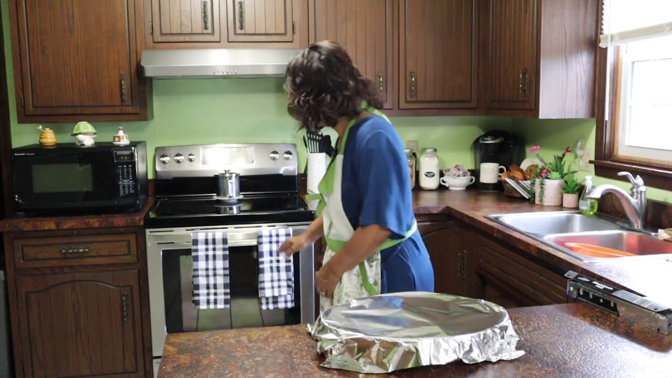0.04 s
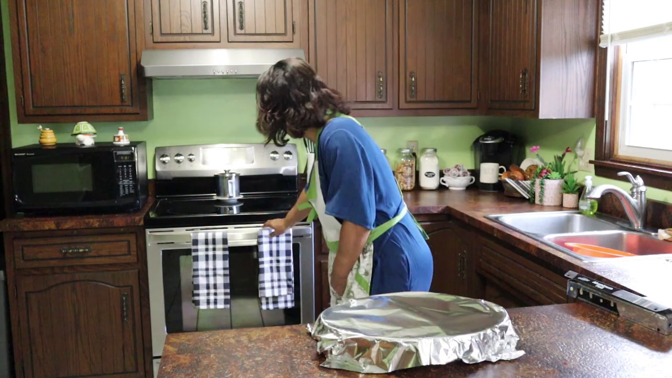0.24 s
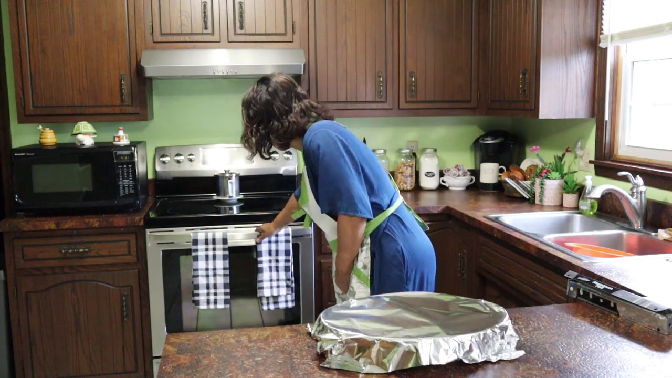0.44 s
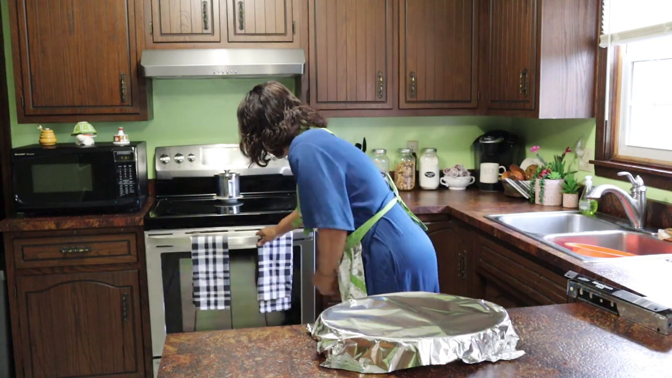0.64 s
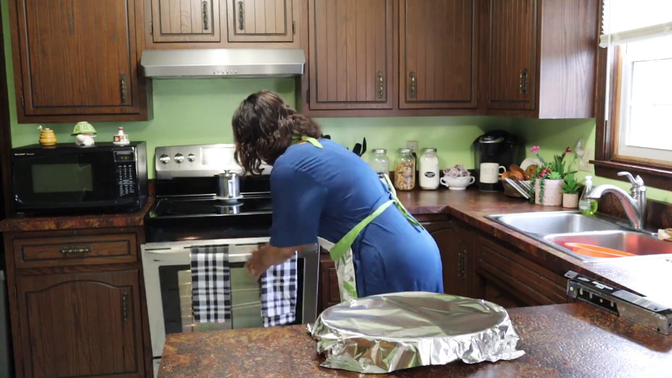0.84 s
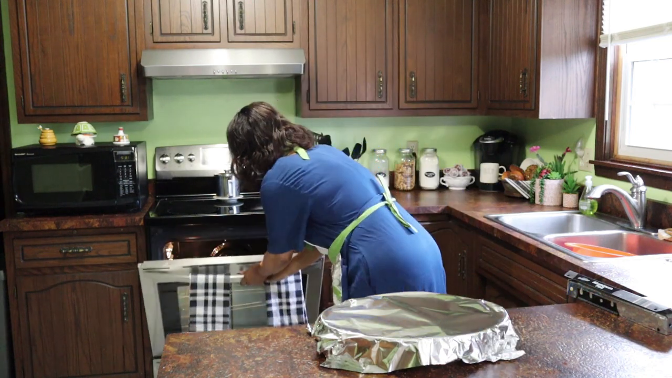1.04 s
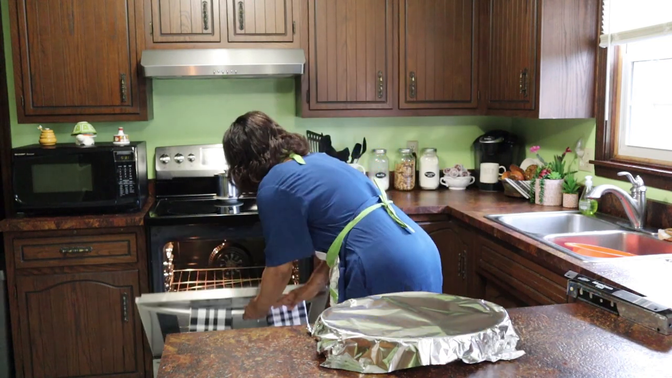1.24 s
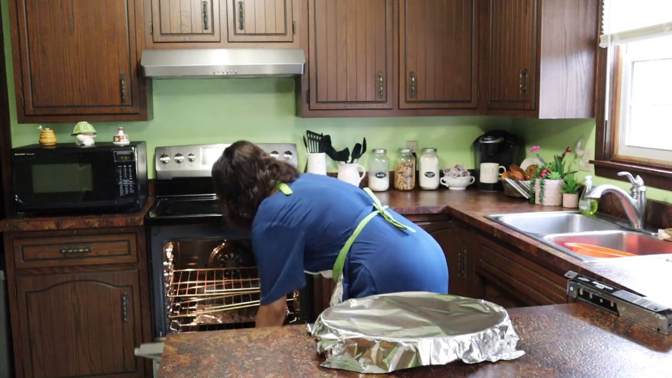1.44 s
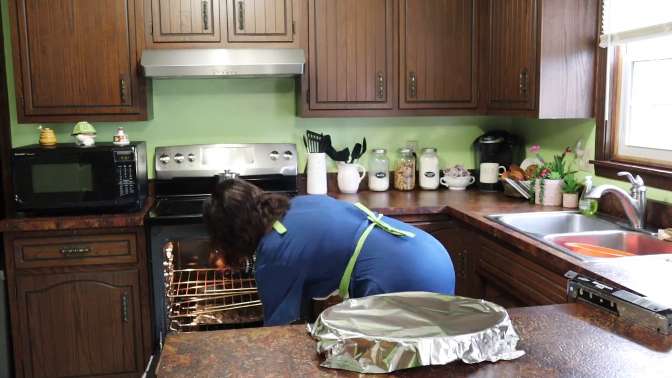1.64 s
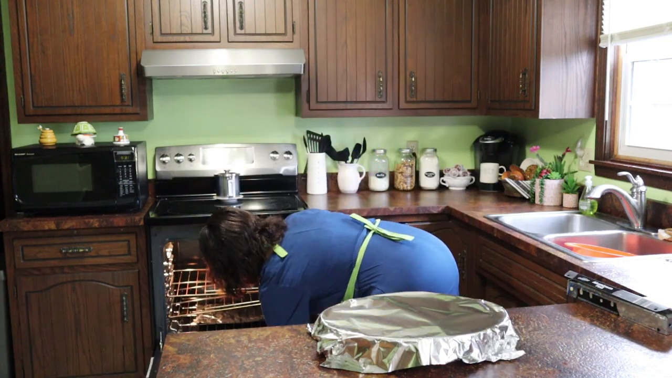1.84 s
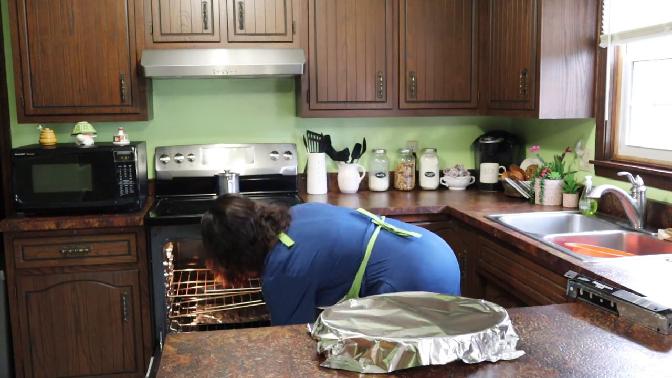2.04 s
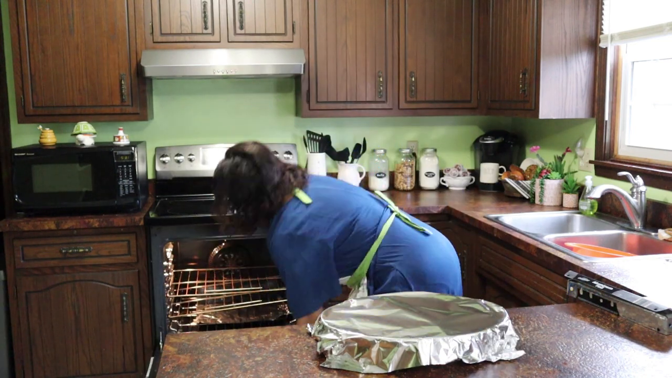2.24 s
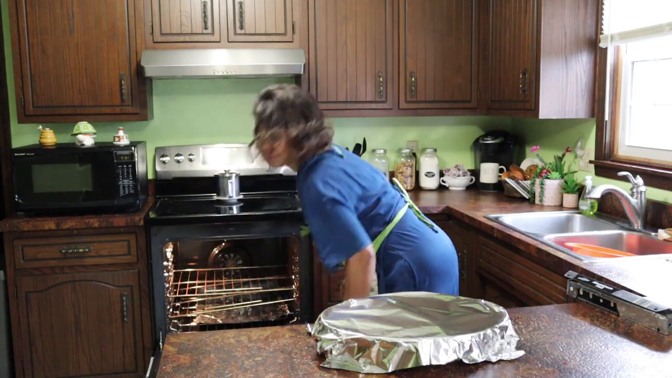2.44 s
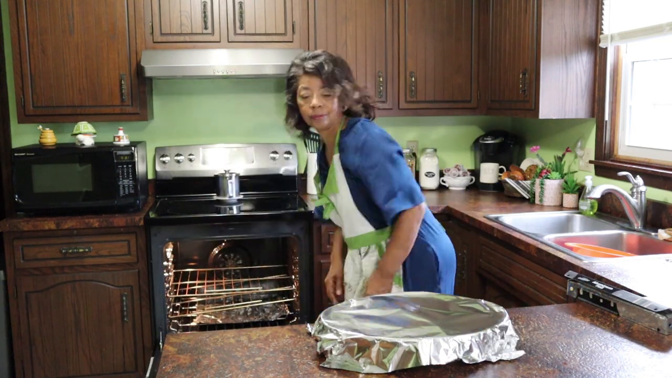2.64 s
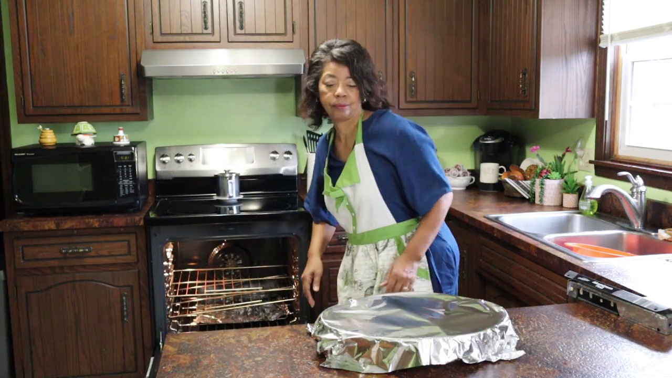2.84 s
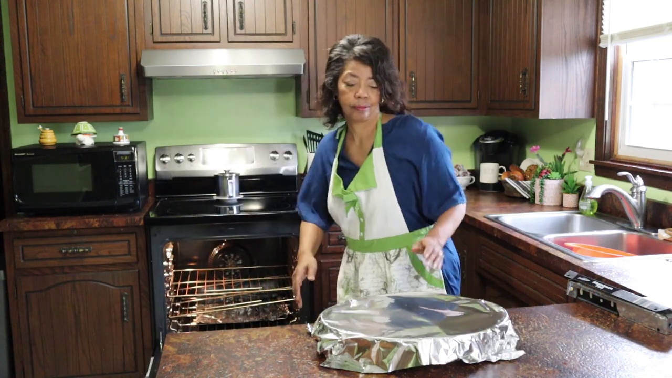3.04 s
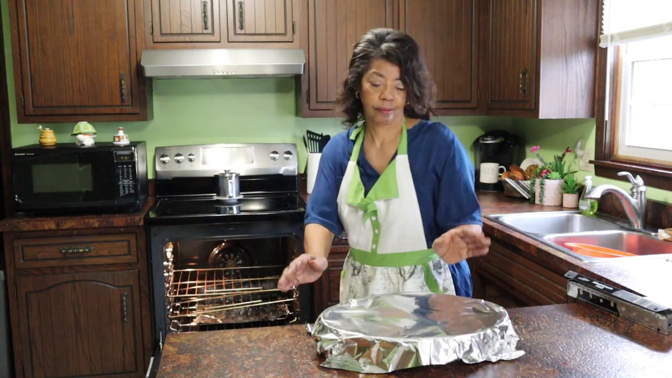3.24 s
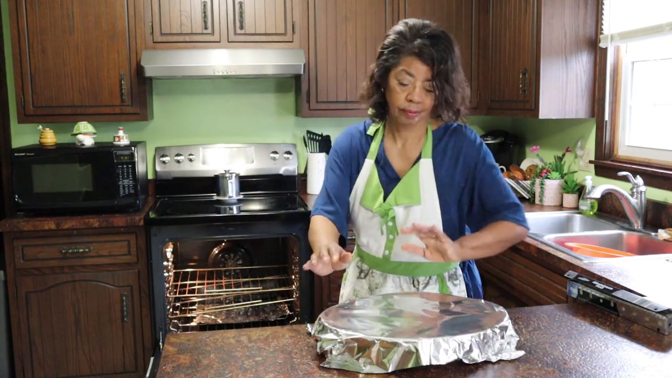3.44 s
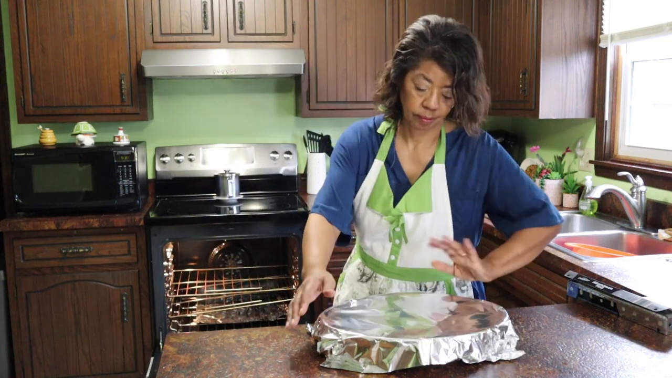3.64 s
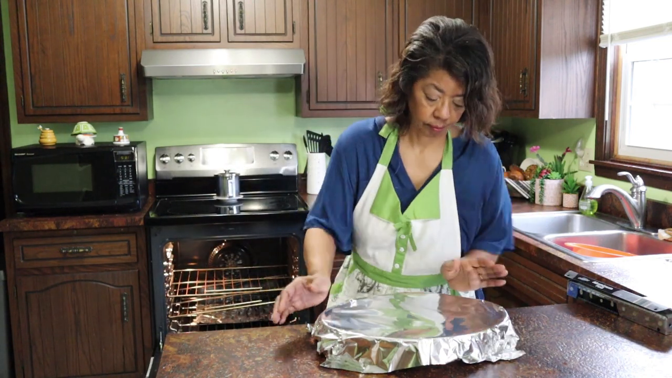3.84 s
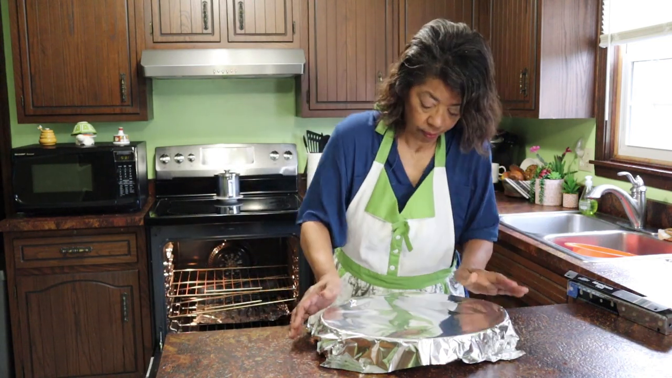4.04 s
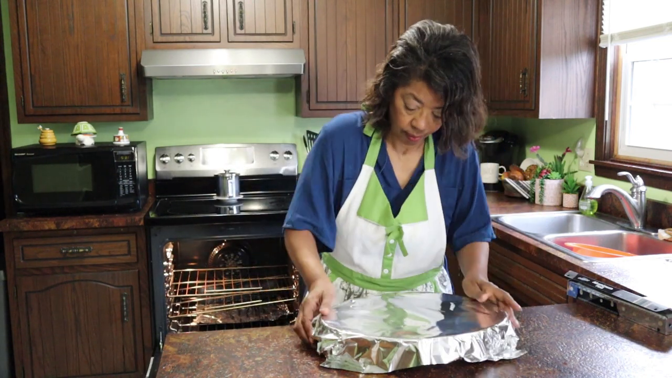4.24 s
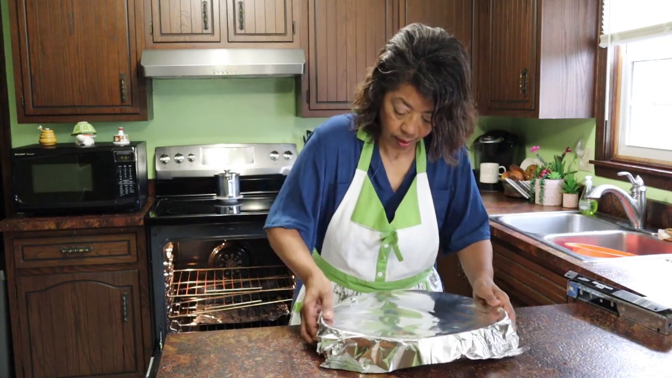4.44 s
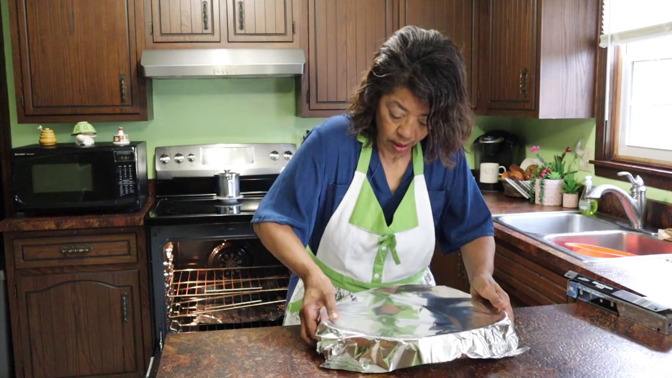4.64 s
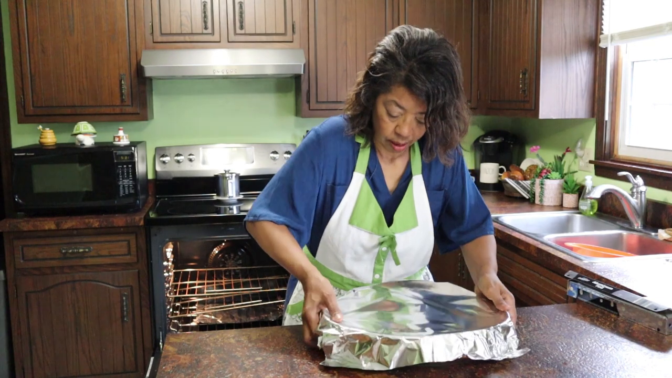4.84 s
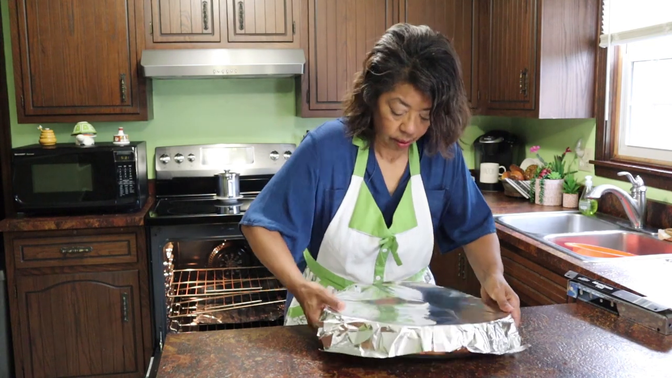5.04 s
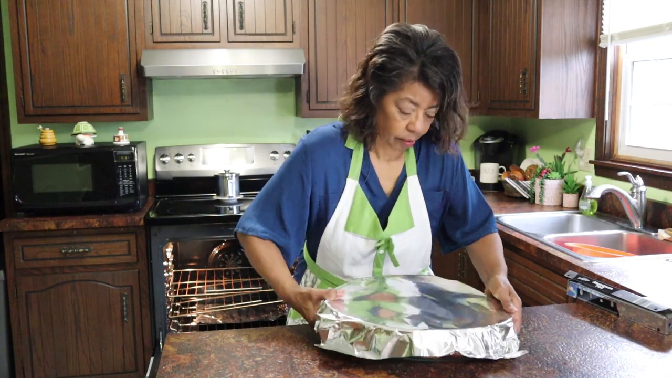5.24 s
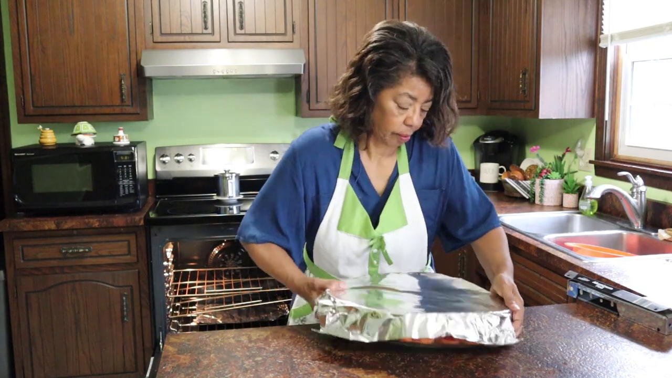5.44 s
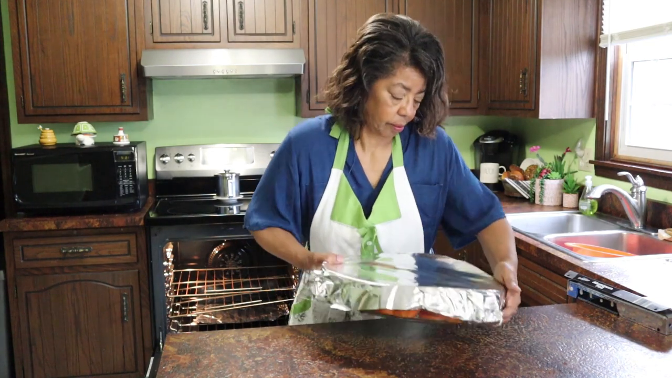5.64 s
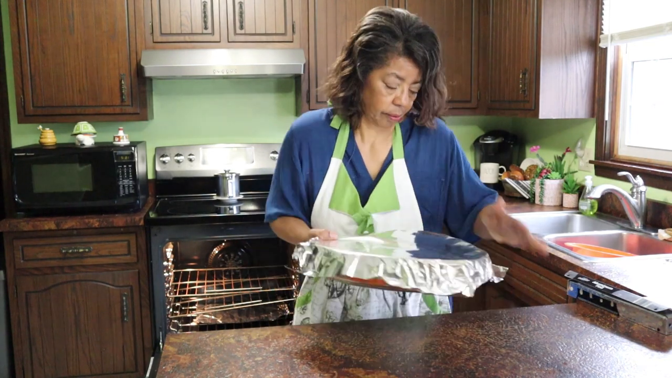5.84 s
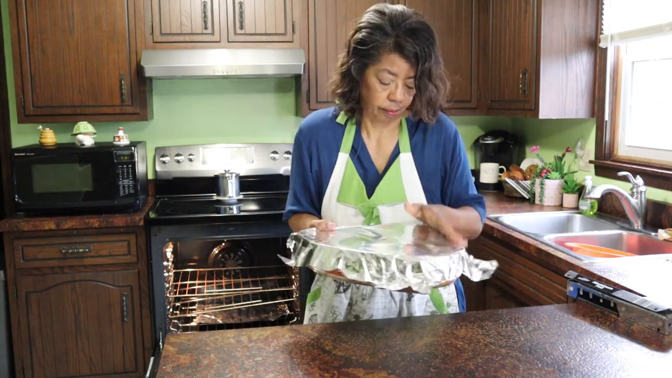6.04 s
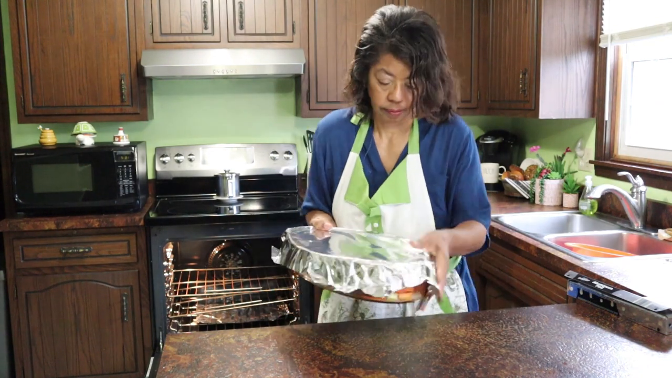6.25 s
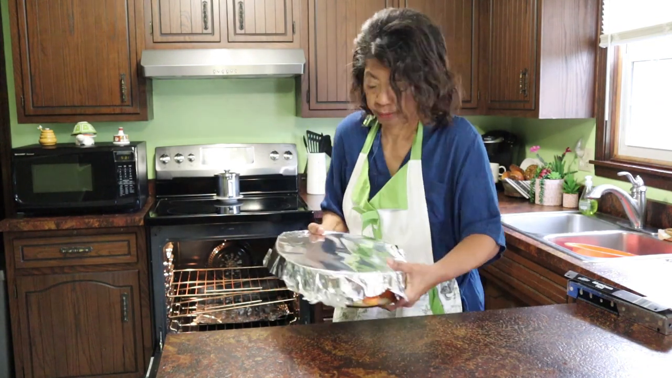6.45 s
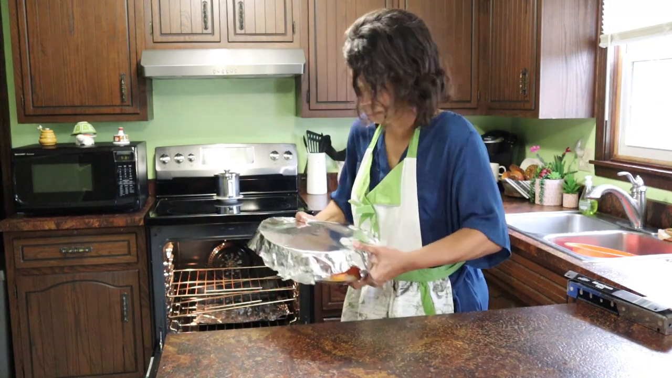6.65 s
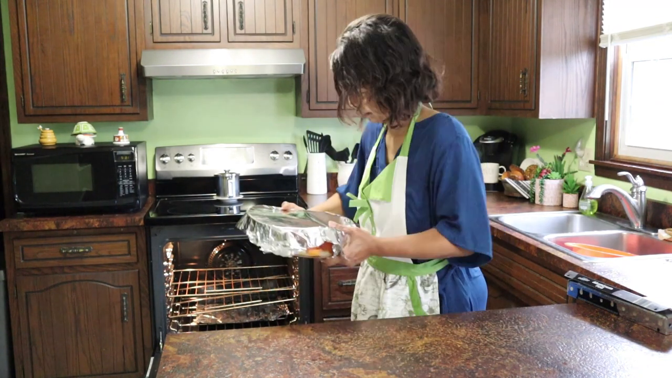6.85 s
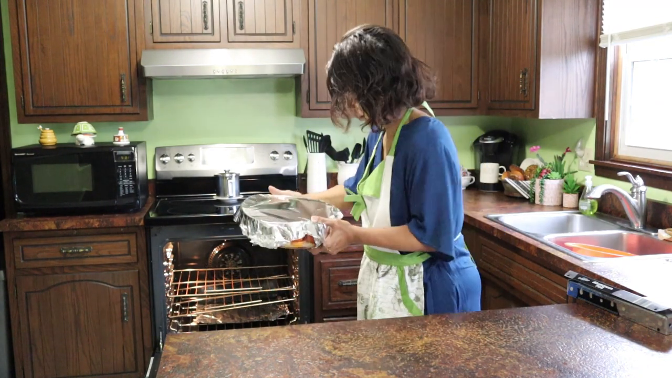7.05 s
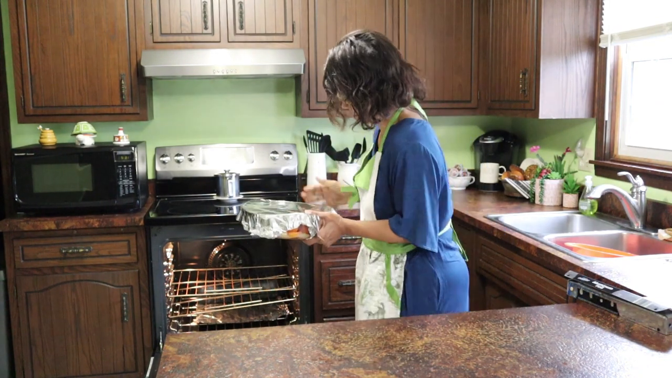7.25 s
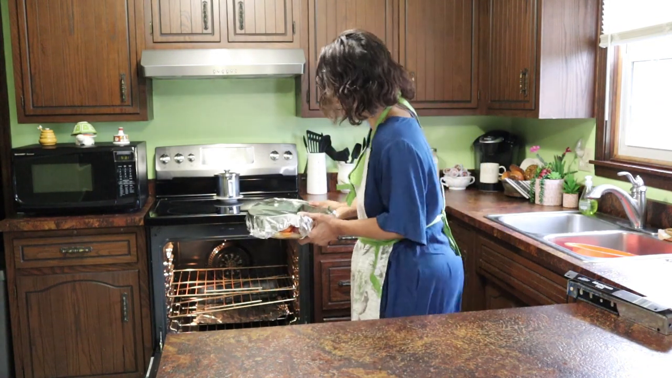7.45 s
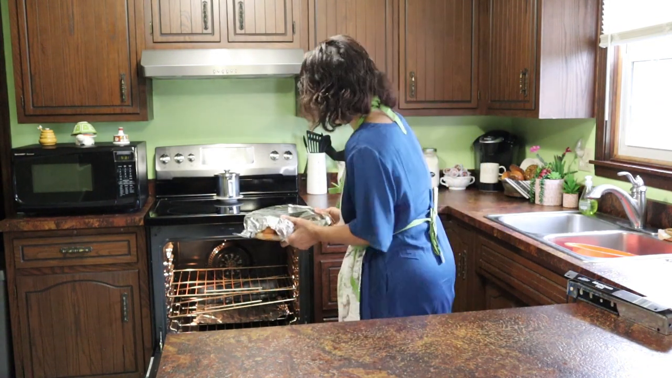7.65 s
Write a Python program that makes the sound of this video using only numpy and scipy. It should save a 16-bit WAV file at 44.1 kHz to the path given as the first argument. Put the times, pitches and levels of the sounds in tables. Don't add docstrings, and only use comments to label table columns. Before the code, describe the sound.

In a small, hard-walled kitchen, faint cloth and footsteps lead to an oven door pulled free, rattling on its hinge, gliding down and dropping onto its stops with a metallic crash and hollow boom. After a quiet shuffle, foil crumples close to the microphone, a heavy dish knocks twice on the counter, then sharp foil snaps as it is lifted and carried. A phone-like stereo microphone hears low room air.

```python
import sys
import numpy as np
from scipy import signal
from scipy.fft import rfft, irfft
from scipy.io import wavfile
from scipy.ndimage import uniform_filter1d

SR = 44100
rng = np.random.default_rng(int(sys.argv[2]) if len(sys.argv) > 2 else 0)


def ratio_of_db(decibels):
    return 10 ** (np.asarray(decibels, float) / 20)


def inscribe(sig):
    pcm = np.round(np.clip(np.atleast_2d(sig).T, -1, 1) * 32767)
    wavfile.write(sys.argv[1], SR, pcm.astype(np.int16))


N = 339570


def evened(x):
    return x / np.sqrt(np.mean(x ** 2) + 1e-20)


def read(points, hz):
    f, value = np.transpose(points)
    return np.interp(np.log(hz + 1), np.log(f + 1), value)


def add(mix, s, sound):
    part = mix[round(s * SR):][:len(sound)]
    part += sound[:len(part)]


def colour(x, points):
    n = x.shape[-1]
    gain = ratio_of_db(read(points, np.fft.rfftfreq(n, 1 / SR)))
    return irfft(rfft(x) * gain, n)


def resonate(x, hz, width_hz):
    r = np.exp(-np.pi * width_hz / SR)
    return signal.lfilter([1 - r, 0, r - 1], [1, -2 * r * np.cos(2 * np.pi * hz / SR), r * r], x)


def burst(rise, t60):
    t = np.arange(SR // 2) / SR
    contacts = rng.standard_normal(len(t)) * ratio_of_db(1.94 * rng.exponential(1, len(t)))
    return contacts * np.minimum(t / rise, 1) * ratio_of_db(-60 * t / t60)


# start in seconds, level in dB, rise in seconds,
# rattle t60 in seconds, treble slope in dB per octave.
DOOR_BLOWS = [
    (.672, -30.5, 0.011, 0.094, 0),
    (.822, -28.5, 0.024, 0.12, -1),
    (0.956, -36.5, 0.01, 0.2, 1.5),
    (1.952, -28, 0.0072, 0.2, -6.5),
]
# pitch in Hz, width in Hz, level in dB.
DOOR_PANELS = [
    [(437, 65, -3), (970, 19, -2), (1197, 16, 1), (1680, 36, -4), (2840, 74, -4.5), (3230, 66, -10),
     (4070, 110, -13), (6160, 32, -14), (6700, 50, -31)],
    [(410, 13, -2), (1550, 190, 0), (2400, 42, -9), (2600, 51, -12), (2970, 27, -14), (3100, 95, -15),
     (3420, 300, -4.5), (4400, 110, -6), (5500, 64, -36)],
    [(890, 35, -1), (1090, 34, 0), (1400, 30, -7), (1680, 26, -10), (2720, 54, -5.5), (5040, 48, -6),
     (6100, 42, -18), (6560, 33, -10)],
    [(520, 150, 8), (1025, 57, -17), (1460, 88, -2), (2310, 98, 4.5), (2580, 24, -9), (2870, 100, -5),
     (3340, 95, -4), (4350, 86, -1), (5150, 39, -29)],
]
BLOW_SIZZLE_DB = [-9, -19, -20, -11]


def door():
    out = np.zeros(N)
    for (s, db, rise, t60, slope_db), panels, sizzle_db in zip(DOOR_BLOWS, DOOR_PANELS, BLOW_SIZZLE_DB):
        drive = burst(rise, t60)
        rings = sum(ratio_of_db(p_db) * resonate(drive, hz, 2.66 * width) for hz, width, p_db in panels)
        rings = colour(rings, [(2500, -2.5), (6500, -11.5), (9000, -13.5)])
        crash = colour(drive, [(60, 8.0), (400, 5), (1600, 7.0), (6400, 2 * slope_db),
                               (9000, sizzle_db - 2), (12500, sizzle_db), (15500, -63)])
        blow = evened(evened(rings) + 0.58 * evened(crash))
        add(out, s, 0.49 * ratio_of_db(db) * blow)
    return out


# start in seconds, level in dB, pitch in Hz,
# rise in seconds, t60 in seconds.
OVEN_BOOMS = [(0.659, -45, 81, .01, 0.22), (0.828, -38.5, 76.5, 0.022, 0.59),
              (0.871, -36.5, 112.6, .03, 0.36), (0.959, -39, 66, 0.016, 0.33), (.97, -47, 35.2, .03, 1),
              (1.924, -40, 88.4, .005, 0.22), (1.953, -29.5, 80, 0.013, 0.24), (1.96, -47, 55.3, .02, .4)]


def booms():
    out, t = np.zeros(N), np.arange(SR // 2) / SR
    for s, db, hz, rise, t60 in OVEN_BOOMS:
        swell = 1 - np.exp(-t / rise)
        add(out, s, ratio_of_db(db + 8.0 - 60 * t / t60) * swell * np.sin(2 * np.pi * hz * t))
    return out


def effort(strokes, shakes, treble_fall, body_fall, body_db):
    s = np.arange(0, N / SR + .1, .002)
    start, swell, db, fall, bright_db = np.transpose(strokes)[:, :, None]
    rise = np.clip((s - start) / swell, 0, 1) ** 3.04
    after = np.maximum(s - start - swell, 0)

    def total_db(lift_db, speed):
        power = rise * ratio_of_db(2 * (db + lift_db - speed * fall * after))
        return 10 * np.log10(np.sum(power, axis=0) + 1e-12)

    level = total_db(0, 1)
    treble = np.clip(total_db(bright_db, treble_fall) - level, -35, 20)
    body = total_db(body_db, body_fall) - level
    shake = sum(up_db * np.exp(-((s - mid) / half) ** 2) for mid, half, up_db in shakes)
    return s, level, treble, body + shake


def rustle(controls, points, per_s, spread_db, ring_t60, ring_db, low_hz, high_hz, usual_db):
    s, level_db, treble_db, body_db = controls
    clicks = ratio_of_db(spread_db * np.minimum(rng.exponential(1, N), 3)) * (rng.random(N) < per_s / SR)
    keep = ratio_of_db(-2 * 60 / SR / ring_t60)
    ring = np.sqrt(signal.lfilter([1 - keep], [1, -keep], clicks ** 2))
    starts = np.minimum(rng.exponential(1, N), 2) ** 2 * (rng.random(N) < 70 / SR)
    crinkles = signal.lfilter([1], [1, -np.exp(-1 / (0.0069 * SR))], starts)
    grains = (clicks + ratio_of_db(ring_db) * ring) * np.sqrt(1 + 0.53 * crinkles)
    sheet = colour(rng.standard_normal((2, N)) * grains, points)

    hz, t, z = signal.stft(sheet, SR, nperseg=512, noverlap=384)
    low = 1 / (1 + (hz / low_hz) ** 4)
    high = 1 / (1 + (high_hz / (hz + 1)) ** 4)
    body_gain_db = np.outer(low, np.interp(t, s, np.minimum(body_db, 6)))
    treble_gain_db = np.outer(high, np.interp(t, s, treble_db - usual_db))
    z = z * ratio_of_db(body_gain_db + treble_gain_db)
    patches = uniform_filter1d(rng.standard_normal(z.shape[1:]), size=14, axis=0)
    patches = uniform_filter1d(patches, size=8, axis=1)
    z = z * ratio_of_db(0.86 * evened(patches))
    sheet = signal.istft(z, SR, nperseg=512, noverlap=384)[1][:, :N]
    effort_db = np.interp(np.arange(N) / SR, s, level_db, left=-120, right=-120)
    return evened(sheet) * ratio_of_db(effort_db)


# pitch in Hz, level in dB per Hz.
FOIL_TONE = [(88, -42), (150, -21.5), (253, -10), (420, -7.5), (644, -0.5), (753, -1.5), (896, 1),
             (1370, -4), (2930, -1), (8710, -3.5), (11200, -6.5), (13600, -10.5), (15600, -19)]
# start in
# seconds, swell in seconds, level in dB, fall in dB per second, brightness in dB.
FOIL_SQUEEZES = [(4.298, 0.026, -30, 200, -6.5), (4.34, 0.04, -32, 110, -5), (4.455, 0.044, -31.5, 93, -1),
                 (4.47, 0.18, -29, 148, -1.5), (4.63, 0.068, -29.5, 303, -1),
                 (4.70, 0.039, -35.5, 54, -9.5), (4.92, 0.033, -34, 60, -2), (4.94, .04, -27.5, 120, 1),
                 (4.98, 0.037, -27.5, 71, 0.5), (5.06, 0.037, -31, 58, 0), (5.14, 0.016, -32, 42, 1.5),
                 (5.23, 0.047, -27.5, 117, -2.5), (5.33, 0.11, -31, 100, 1), (5.44, .034, -26.5, 96, 3),
                 (5.556, 0.015, -31, 50, -0.5), (5.66, .09, -41.5, 92, -9), (5.825, 0.017, -30.5, 74, 0),
                 (5.84, 0.054, -24, 145, 2),
                 (6.02, 0.14, -48, 9, -7), (6.165, 0.029, -20.5, 140, 3.5), (6.22, 0.078, -27, 25.8, 2),
                (6.36, 0.098, -31.5, 58, 7.5), (6.69, 0.043, -33.5, 51, 0), (6.74, 0.027, -31.5, 67, 1.5),
                (6.85, 0.076, -37.5, 52, -1), (7.104, .008, -50, 250, 9.5), (7.145, 0.04, -38, 103, -1.5),
                (7.324, 0.0078, -42.5, 71, -29), (7.424, .025, -30, 46, 2), (7.461, 0.074, -26.5, 155, 6),
                (7.58, 0.073, -28.5, 96, 2.5)]
# middle in seconds, half length in seconds, added body in dB.
DISH_SHAKES = [
    (5.28, 0.11, 15),
]


def foil():
    hands = effort(FOIL_SQUEEZES, DISH_SHAKES, treble_fall=1.53, body_fall=0.71, body_db=-4.5)
    return ratio_of_db(3.0) * rustle(hands, FOIL_TONE, per_s=5000, spread_db=4.0, ring_t60=0.11, ring_db=13.0,
                             low_hz=1280, high_hz=5650, usual_db=1.44)


# start in seconds, peak in dB, treble in dB against the peak.
FOIL_SNAPS = [(4.36, -14.5, -3), (4.5992, -14.5, -8), (4.7093, -16.5, -4), (4.8004, -23.5, 4),
              (4.8537, -22, 0), (5.3753, -15.5, -3), (5.569, -17, -1), (5.7746, -18.5, -12),
              (6.186, 1, 1.5), (6.1945, -4, 4), (6.212, -12, 2), (6.4795, -7, 5), (6.6046, -15, -5.5),
              (6.65, -40, -2), (6.766, -16, 10), (6.9333, -19.5, 8.5), (7.0054, -20, 4), (7.048, -25, -1),
              (7.1078, -24.5, -4), (7.1853, -24, 2), (7.245, -31, -4), (7.331, -28, 1.5),
              (7.61, -11.5, 4.5)]
# start in seconds, peak
# in dB.
MORE_SNAPS = [(4.325, -16), (4.3851, -16), (4.4864, -18), (4.9672, -14), (4.978, -12), (5.0192, -15.5),
              (5.2897, -14.5), (5.458, -15.5), (5.8899, -22), (6.2292, -11.5), (6.4501, -7.5),
              (6.57, -25.5), (6.8692, -25), (7.4381, -11.5), (7.464, -8.5), (7.525, -5), (7.5394, -9.5)]


def snaps():
    out, bright = np.zeros(N), np.zeros(N)
    for s, db, treble_db in FOIL_SNAPS + [(s, db, 0) for s, db in MORE_SNAPS]:
        crack = burst(0.0011, 0.044) * ratio_of_db(db - 8.5)
        add(out, s, crack)
        add(bright, s, crack * (ratio_of_db(treble_db) - 1))
    out += signal.lfilter(*signal.butter(2, 7000 / (SR / 2), "high"), bright)
    return colour(out, FOIL_TONE)


# start in seconds, peak in dB, pitch in Hz, t60 in seconds.
CREASE_PINGS = [(4.3238, -16, 2530, 0.013), (4.457, -20, 6530, 0.012), (4.498, -18, 3060, 0.012),
                (4.6004, -16, 2760, 0.012), (4.6963, -15, 2620, 0.012), (5.0114, -13, 7280, 0.012),
                (5.0204, -14, 3010, 0.012), (5.094, -19, 2990, 0.01), (5.458, -14, 4900, 0.012),
                (6.1924, -7, 7950, 0.012), (6.197, -2, 11550, 0.0097), (6.2234, -11, 11200, 0.012),
                (6.6044, -16, 3320, 0.013), (6.6494, -18, 3890, 0.012), (6.7614, -18, 11600, 0.013),
                (6.766, -15, 3800, 0.012), (6.9331, -21, 11300, 0.012), (7.1086, -22.5, 3910, 0.012),
                (7.1871, -25, 4720, 0.012), (7.4383, -15, 3750, 0.011), (7.5224, -7, 5810, 0.01),
                (7.5267, -7.5, 11100, 0.012)]
RACK_TICKS = [(0.4714, -49, 1730, 0.02), (0.5387, -38, 3470, 0.02), (0.6771, -21, 1650, 0.02),
              (0.828, -18, 1400, 0.02), (0.8411, -16.5, 1614, 0.022), (0.9617, -25, 1090, 0.018),
              (1.2214, -47, 1640, 0.02), (1.486, -39, 1620, 0.022), (1.6164, -44, 1180, 0.02),
              (1.9598, -18, 1070, 0.022), (1.9814, -19, 1440, 0.017), (2.236, -36, 1750, 0.018),
              (2.4037, -31, 1100, 0.02), (3.3194, -40, 2030, 0.02), (3.3403, -35, 1540, 0.02),
              (3.5382, -41, 1160, 0.018), (4.117, -50, 1250, 0.02)]


def pings(rows, lift_db):
    out, t = np.zeros(N), np.arange(SR // 20) / SR
    for s, db, hz, t60 in rows:
        overtone_hz = min(1.63 * hz, SR / 3)
        ring = np.sin(2 * np.pi * hz * t) + 0.56 * np.sin(2 * np.pi * overtone_hz * t)
        add(out, s, ratio_of_db(db + lift_db - 60 * t / t60) * ring)
    return out


# start in seconds, level in dB.
DISH_KNOCKS = [
    (5.1672, -9),
    (5.2705, -15.5),
]
# delay in seconds, level in dB.
DISH_BOUNCES = [
    (.015, -13.5),
    (0.00908, -10),
]
# pitch in Hz, t60 in seconds, first knock in dB, second knock in dB.
COUNTER_MODES = [(75, 0.2, -7.5, 0), (115, 0.32, -13.5, -11), (173, 0.19, -7, 1.5), (197, 0.29, -7, -6),
                 (232.5, 0.25, -16, -9.5), (282, 0.055, 9.5, 14.5), (319, 0.065, 1.5, 3.5),
                 (484, 0.11, 2, 3.5), (624, 0.22, -5.5, -6), (685, 0.67, -9.5, -5.5), (693, 0.5, -12, -9),
                 (718, 0.083, 4.5, 10.5), (767, 0.074, -3, -6), (410, .1, -9, -2), (935, 0.063, -4, -10),
                 (1006, 0.14, -3, -2), (1085, 0.11, 0, 1.5), (1479, 0.084, -10, 1), (1570, 0.089, -14, -15)]


def knocks():
    out, t = np.zeros(N), np.arange(SR // 2) / SR
    for k, (s, db) in enumerate(DISH_KNOCKS):
        modes = sum(ratio_of_db(m[2 + k] - 60 * t / m[1]) * np.sin(2 * np.pi * m[0] * t) for m in COUNTER_MODES)
        slap = colour(burst(.0005, .03), [(100, -10), (300, 0), (1600, -2), (3000, -16), (6000, -40)])
        blow = 0.56 * ratio_of_db(db) * (modes * (1 - np.exp(-t / 0.0012)) + 0.065 * evened(slap))
        out = out * np.where(np.arange(N) / SR > s, .3, 1)
        add(out, s, blow)
        delay, bounce_db = DISH_BOUNCES[k]
        add(out, s + delay, ratio_of_db(bounce_db - 60 * t / 0.097) * blow)
    return out


# start in seconds, peak in dB, centre in Hz,
# t60 in seconds, share of broad noise in dB.
SMALL_BUMPS = [(0.123, -40.5, 420, 0.098, -7), (0.167, -38, 900, 0.21, -1), (0.209, -35, 770, 0.32, -6),
               (0.538, -46.5, 301, 0.13, 4), (.69, -34, 540, .12, -10), (2.446, -47, 2300, .08, -8),
               (0.611, -33, 410, 0.27, -8), (1.925, -43, 302, 0.14, -8), (2.232, -44, 480, 0.13, 5),
               (2.399, -35.5, 970, 0.059, -22), (2.439, -42, 1060, 0.079, 0),
               (2.689, -44, 2050, 0.068, -13), (2.742, -39, 636, 0.21, -15), (3.312, -44.5, 323, 0.11, 1.5),
               (3.339, -49.5, 361, 0.18, 12), (3.537, -43.5, 875, 0.077, -0.5),
               (4.038, -46.5, 312, 0.062, -13), (4.826, -34.5, 298, 0.07, 1.5)]
WEIGHT_THUDS = [(1.919, -38, 500, .06, -21), (4.269, -38.5, 900, 0.06, -8), (4.271, -39, 161, 0.14, -20),
                (4.581, -49, 85, 0.42, -19), (4.821, -38, 75, 0.077, -23), (7.298, -45, 148, 0.44, 10)]


def bumps():
    out = np.zeros(N)
    for k, (s, db, hz, t60, broad_db) in enumerate(SMALL_BUMPS + WEIGHT_THUDS):
        rise = 0.0037 if k < len(SMALL_BUMPS) else 0.32 / hz
        drive = burst(rise, t60)
        broad = colour(drive, [(100, 0.0), (500, 6.5), (3000, 1), (12000, -43.0)])
        bump = evened(resonate(drive, hz, 0.37 * hz)) + ratio_of_db(broad_db) * evened(broad)
        add(out, s, 0.14 * ratio_of_db(db) * bump)
    return out


# pitch in Hz, level in dB per Hz.
MOVES_TONE = [(18, -38), (30, -2), (75, -3.5), (216, -9), (394, -9.5), (448, -6.5), (552, -11), (859, -12),
              (6530, -22), (11600, -27), (15000, -24.5)]
# start in seconds, swell in seconds, level in dB,
# fall in dB per second, brightness in dB.
CLOTH_SHUFFLES = [(0.0, .005, -51, 80.4, -17), (.088, 0.0069, -53.5, 35, -9), (.3, 0.067, -62, 30, -8),
                  (.454, 0.011, -49.5, 60, -12.5), (.47, 0.071, -45.5, 300, -12.5),
                  (2.35, 0.079, -47, 97, -10), (2.515, 0.055, -48, 60, -7), (2.57, 0.1, -51.5, 60, -17),
                  (2.75, 0.21, -58, 60, -20), (3.0, 0.084, -54.5, 40, -16), (3.2, 0.091, -54, 60, -15),
                  (3.31, 0.033, -46, 67, -11.5), (3.51, 0.018, -52, 60, -9.5), (3.7, .23, -59, 50, -24),
                  (3.928, .014, -55, 48, -13), (4.266, 0.0081, -37, 1500, -36), (4.29, 0.043, -57, 240, 10)]
DOOR_GLIDES = [(.6, 0.087, -39.5, 40, -40), (0.658, 0.021, -40, 89, -3.5), (.83, 0.087, -30.5, 100, -29),
               (0.954, 0.0049, -38, 73, -13), (1.21, 0.078, -48, 30, -11), (1.25, 0.45, -41.5, 30, -22.5),
               (1.61, .05, -57.5, 40, -6), (1.6, 0.268, -48, 470, -17), (1.9, 0.073, -38.5, 370, -33),
               (1.95, 0.005, -49, 61, -2), (1.97, 0.049, -44, 25, -16.5)]
# middle in seconds, half length in seconds, added body in dB.
DOOR_SHAKES = [
    (1.5, 0.25, 17),
    (2.03, 0.12, 20),
]


def moves():
    body = effort(CLOTH_SHUFFLES + DOOR_GLIDES, DOOR_SHAKES, treble_fall=1.7, body_fall=0.64, body_db=-11.5)
    return ratio_of_db(1.5) * rustle(body, MOVES_TONE, per_s=6000, spread_db=-0.5, ring_t60=0.053, ring_db=11.0,
                             low_hz=181, high_hz=4100, usual_db=-7.0)


# pitch in Hz, t60 in seconds.
KITCHEN_T60 = [(80, 0.6), (260, 0.32), (700, 0.43), (1840, 0.39), (4850, 0.31), (12000, 0.22)]


def kitchen(x, wet_db, side_direct):
    size = SR // 2
    taps = np.zeros((2, size))
    at = np.arange(120, size - 30, 20) + rng.integers(0, 20, (2, (size - 150) // 20))
    np.put_along_axis(taps, at, rng.choice([-1., 1.], at.shape), 1)
    hz, t, z = signal.stft(taps, SR, nperseg=256)
    decay = ratio_of_db(-60 * t / read(KITCHEN_T60, hz)[:, None])
    tail = signal.istft(z * decay, SR, nperseg=256)[1]
    tail *= ratio_of_db(wet_db) / np.linalg.norm(tail[0])
    tail[:, 0] += [1, side_direct]
    return signal.oaconvolve(x[None], tail, axes=1)[:, :N]


# pitch in Hz, level in dB per Hz.
AIR_TONE = [(12, -28), (20, 15.5), (38, 0), (105, 0.5), (178, -4.5), (445, -4.5), (940, -11), (1590, -11),
            (11400, -33.5), (12700, -40), (15000, -69)]


def air():
    return ratio_of_db(-52) * evened(colour(rng.standard_normal((2, N)), AIR_TONE))


# pitch in Hz, side against middle in dB.
SIDE_TONE = [(30, -42), (60, -32), (125, -8), (250, -4.5), (500, -6), (1000, -2.5), (2000, 0.5),
             (4000, 2.5), (8000, 4), (15000, 3.5)]


def scene():
    far_source = door() + bumps() + pings(RACK_TICKS, lift_db=-0.5)
    far = kitchen(far_source, wet_db=1.5, side_direct=0.2) * [[ratio_of_db(-7)], [ratio_of_db(-5)]]
    creases = snaps() + pings(CREASE_PINGS, lift_db=-8)
    near = kitchen(creases, wet_db=2.5, side_direct=-0.088) * [[1], [.8]]
    dish = kitchen(knocks(), wet_db=-6.0, side_direct=0.16) * [[1], [.45]]
    middle, side = foil() + moves() + air() + far + near + dish
    lean = np.interp(np.arange(N) / SR, [0, 2, 4.5, 6.5, 7.7], [-0.06, -0.059, -0.16, -0.081, 0.021])
    side = colour(side + lean * middle, SIDE_TONE)
    middle = middle + booms()
    return np.array([middle + side, middle - side])


def band_limit(x):
    return signal.sosfilt(signal.butter(12, 15750, fs=SR, output="sos"), x)


def record(dry):
    heard = signal.lfilter(*signal.butter(2, 40 / (SR / 2), "high"), dry)
    heard = colour(heard, [(9500, -0.6), (11800, 4.0), (12700, 0.5), (13600, -4.0), (15500, -9.0)])
    limited = .9 * np.tanh(heard / .9)
    return band_limit(limited)


dry = scene()
out = record(dry)
inscribe(out)
```